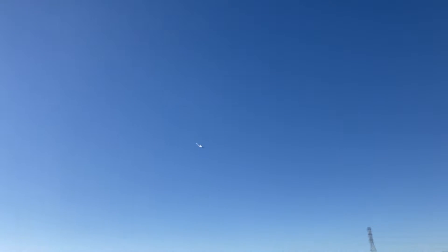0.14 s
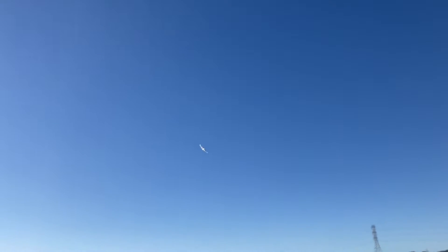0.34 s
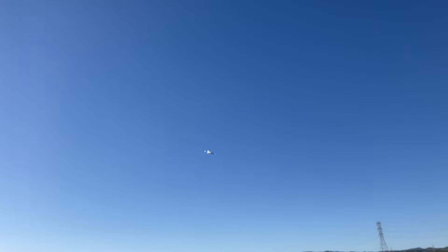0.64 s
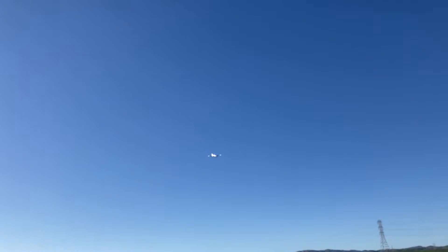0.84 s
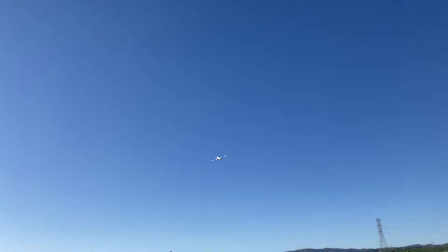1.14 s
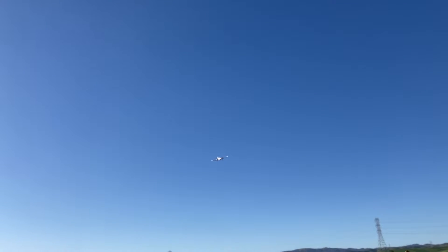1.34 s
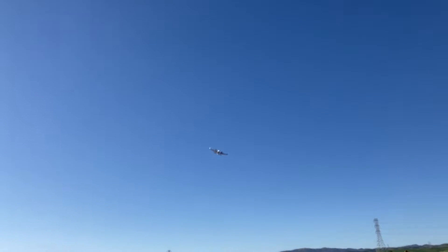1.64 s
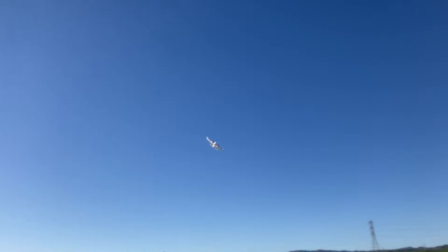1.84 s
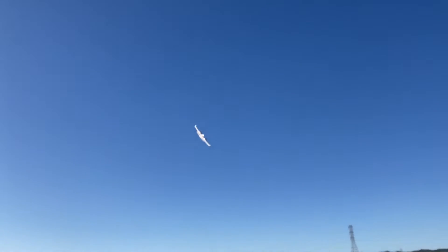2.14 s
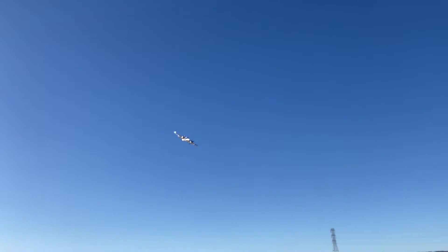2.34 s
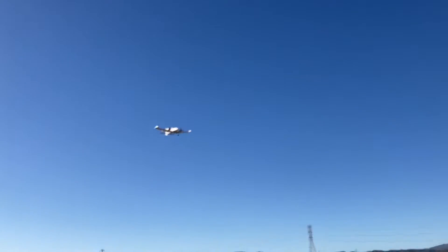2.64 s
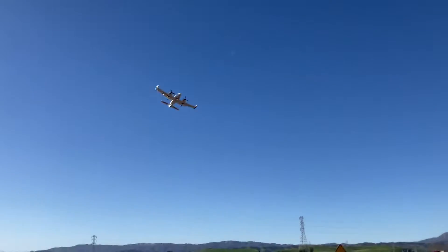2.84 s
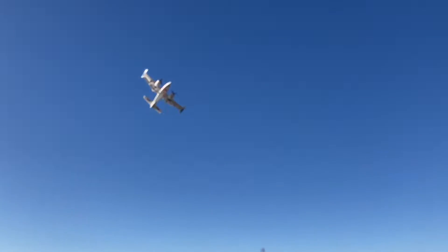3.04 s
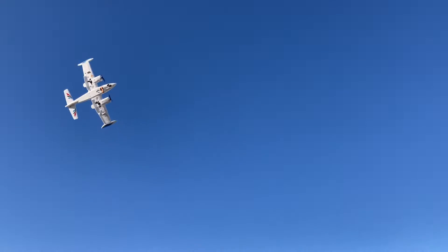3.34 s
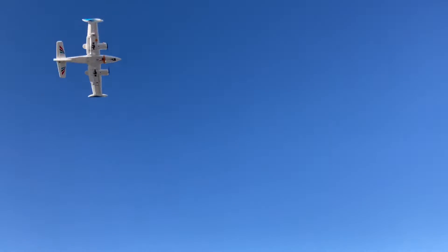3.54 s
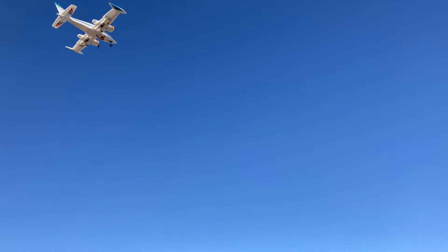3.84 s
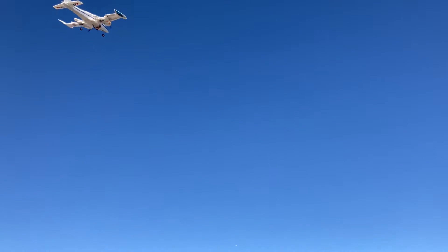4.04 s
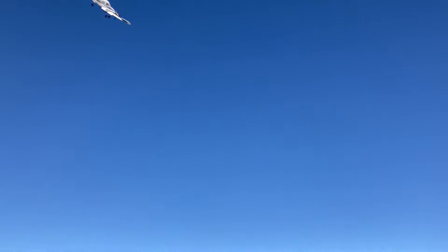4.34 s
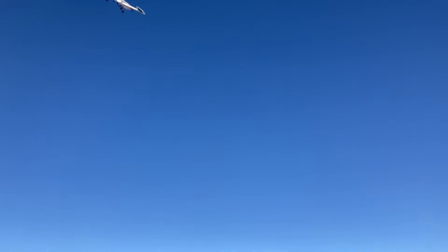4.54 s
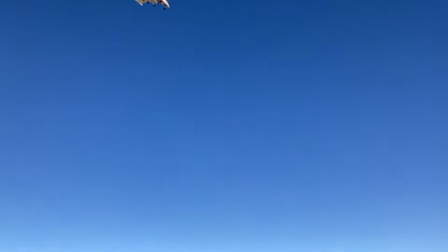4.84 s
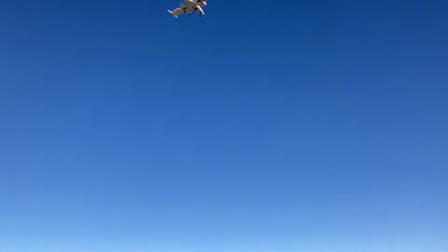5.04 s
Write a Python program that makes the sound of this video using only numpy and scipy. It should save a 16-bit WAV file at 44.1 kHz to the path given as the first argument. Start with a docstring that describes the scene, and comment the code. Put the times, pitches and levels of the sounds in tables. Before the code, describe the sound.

A phone outdoors catches breezy rumble and a muffled wash of open land. A thin piercing whistle grows as a small twin-motor plane approaches; gusts then batter the microphone as it passes low with rushing air and buzzing blades. Afterwards the wind eases, leaving shrill, uneven motor whines that glide down, dip away and return rising, with the plane still near.

```python
"""Twin-motor model airplane pass

A twin-motor electric model airplane comes in from afar, passes low overhead and banks away.
Two motors whine on separate gliding pitches; speed-controller whistles near 8 kHz sink as in Doppler shift.
Propellers buzz, torn air rushes and hisses: shaped noise with chopping and tones at the blade rate.
Noise gusts and short kicks buffet a phone's microphones, over a noise wash of open country."""
import sys
import numpy as np
from scipy import signal
from scipy.fft import rfft, irfft, next_fast_len
from scipy.io import wavfile
from scipy.ndimage import uniform_filter1d

SR = 44100
rng = np.random.default_rng(int(sys.argv[2]) if len(sys.argv) > 2 else 0)


def generate_wav(signal):
    """Clip the signal to [-1, 1] and save it as 16-bit WAV at the path in sys.argv[1]."""
    frames = np.transpose(np.atleast_2d(signal))
    scaled = np.clip(frames, -1, 1) * 32767
    pcm = np.round(scaled).astype(np.int16)
    wavfile.write(sys.argv[1], SR, pcm)


N = 228702
TIME_S, FREQ_HZ = np.arange(N) / SR, np.arange(N // 2 + 1) * SR / N

# stereo image, phase of right behind left: hz, half_turns
STEREO_PHASE = [(3000, 0), (4100, -.25), (6200, -.8), (7700, 0), (8300, 0), (9750, 1), (11400, 2),
                (13150, 3), (15750, 4.5)]
TOP_HZ = 15750

# distant wash, relative: time_s, level_db
COUNTRY_LEVEL = [(0, -35), (.55, -33), (1.9, -33), (3.3, -40), (3.9, -46), (4.4, -43), (4.85, -41),
                 (5.19, -36.5)]
# wash spectrum, relative: hz, density_db
COUNTRY_COLOUR = [(150, 4.5), (400, -0.5), (750, 2), (1100, -8.5), (1550, -21), (2300, -19), (2900, -31),
                  (3500, -46.5), (6000, -57.5)]
# the wash opens out to the sides
OPENS_FROM_S, OPENS_OVER_S = 3.13, 0.36

# gusts: full_strength_s, hold_s, rumble_db, relative_turbulence_db
GUSTS = [(0.0, 0.0035, -36, -24.5), (0.13, 0.06, -46, -43), (0.43, 0.086, -24, -33.5),
         (0.588, 0.075, -26, -43), (0.758, 0.091, -24.5, -41), (1.1, 0.14, -30, -30),
         (1.272, 0.13, -33.5, -33.5), (1.593, 0.041, -24.5, -35), (1.753, 0.21, -26.5, -29.5),
         (2.018, 0.15, -33.5, -34.5), (2.57, 0.03, -31, -28.5), (2.654, 0.095, -20, -17.5),
         (2.8, 0.054, -16, -14), (2.875, 0.055, -18, -19.5), (2.947, 0.04, -14, -15.5),
         (3.041, 0.084, -20.5, -23.5), (3.188, 0.042, -18, -21.5), (3.259, 0.092, -19, -22),
         (3.446, 0.093, -24, -28.5), (3.532, 0.17, -22.5, -25), (4.242, 0.13, -29, -60),
         (4.98, 0.23, -38.5, -57)]
GUST_ATTACK_S, GUST_RELEASE_S = .025, .028
# brief drops of the breeze: centre_s, width_s, change_db
CALMS = [(.28, 0.035, -4.5), (.96, 0.046, -7), (2.39, 0.075, -6.5), (4.62, 0.036, -8)]
# wind spectra, relative: hz, density_db
RUMBLE_COLOUR = [(15, -54), (30, -15.5), (50, 2), (75, 6), (110, 1.5), (160, -6), (250, -15), (500, -56.5)]
TURBULENCE_COLOUR = [(80, -3.5), (170, 5), (280, 1), (450, -4), (700, -15.5), (1100, -22.5), (1700, -37),
                     (3000, -71)]
# breeze between gusts; eddies relative, as in GUSTS
BREEZE_DB, BREEZE_EDDIES_DB, BREEZE_SWAY_DB = -30.5, -43, 1
# breeze rumble gives way to a deeper one, breeze eddies ease
LULL_S, LULL_DB, LULL_RUMBLE_DB, LULL_CORNER_HZ = 4.1, -1.5, -31, 95
# single eddies that slap the microphones: centre_s, relative_level_db, length_s, corner_hz
BUFFETS = [(0.029, -41, .004, 1160), (0.505, -30, 0.0057, 1280), (0.585, -35, .012, 1360),
           (0.63, -27.5, 0.0051, 960), (1.176, -28, 0.0051, 600), (1.19, -39, 0.038, 1380),
           (1.578, -32, 0.018, 1160), (1.781, -28.5, 0.011, 1420), (2.669, -19.5, 0.008, 730),
           (2.735, -12, 0.0093, 333), (2.818, -15.5, 0.0092, 530), (2.821, -26, 0.0057, 1350),
           (2.846, -11, 0.0024, 666), (2.945, -17, 0.0033, 250), (2.966, -15.5, 0.0068, 760),
           (3.047, -14, 0.0014, 687), (3.201, -10.5, 0.0011, 448), (3.283, -20, 0.0042, 550),
           (3.303, -36, 0.0076, 2070), (3.311, -13, 0.008, 170), (3.325, -15, 0.0045, 497),
           (3.389, -25, 0.007, 510), (3.446, -22, 0.011, 430), (3.588, -16.5, 0.017, 365),
           (3.669, -19, 0.019, 384), (3.736, -19.5, 0.032, 285), (3.767, -18, 0.0041, 250),
           (3.843, -17.5, 0.0039, 137), (3.845, -30.5, 0.0045, 760), (3.979, -22, 0.0054, 150),
           (4.412, -15, 0.0031, 127), (4.683, -28.5, 0.005, 150), (4.759, -36, 0.003, 400),
           (4.85, -28, 0.0078, 130), (4.99, -27, 0.0038, 415), (5.061, -36, 0.0053, 1120),
           (5.136, -31, 0.0035, 397)]

# straight pass
NEAREST_S, SPEED_M_S, NEAREST_M = 3.285, 10.8, 3.57
# first motor's whine, set by throttle, eased before the pass and again in the turn: time_s, pitch_hz
THROTTLE = [(0, 4245), (.95, 4665), (1.12, 4640), (1.4, 4530), (1.58, 4555), (1.75, 4460), (1.95, 4175),
            (2.15, 4070), (2.37, 4115), (2.47, 4365), (2.56, 4490), (2.7, 4515), (2.93, 4490), (3.1, 4385),
            (3.21, 4460), (3.29, 4570), (3.41, 4605), (3.57, 4535), (3.7, 4210), (3.98, 3830), (4.2, 3660),
            (4.35, 3370), (4.45, 3250), (4.55, 3250), (4.65, 3480), (4.72, 3740), (4.86, 3975),
            (5.02, 4005), (5.19, 4165)]
# second motor's whine above the first: time_s, offset_hz
SECOND_MOTOR = [(1.4, 20), (2.2, 28), (2.4, 60), (2.75, 130), (3, 135), (3.2, 115), (3.27, 190), (3.5, 115),
                (3.72, 10), (3.85, 60), (4, 70), (4.17, 160), (4.5, 90), (4.62, 110), (4.71, 230),
                (4.93, 190), (5.19, 175)]
# whine pitch per shaft rate; blades per propeller
WHINE_PER_TURN, BLADES = 36, 3

# controllers' switching whistle: time_s, pitch_hz
WHISTLE_PITCH = [(0, 8205), (.6, 8195), (.95, 8165), (1.6, 8185), (2.05, 8135), (2.4, 8150), (2.7, 8110),
                 (3.05, 8070), (3.25, 7990), (3.55, 7895), (3.85, 7805), (4.2, 7770), (4.7, 7785),
                 (5.19, 7810)]
# banking airframe shields or bares the controllers: time_s, change_db
WHISTLE_SHADE = [(0, -14), (.45, -2), (1.3, -1), (3.1, 0), (3.3, 2), (3.65, 0), (3.87, 4), (4.12, -1),
                 (4.3, 0), (4.4, -9), (4.55, -9), (4.62, 1), (5.19, 1)]
# whistle side lines: shaft_rate_multiple, relative_db
SIDE_LINES = [(-1, -10), (1, -14), (3, -17)]
# level at nearest point before shading; loss in the air
WHISTLE_DB, AIR_DB_PER_M = -43, 0.01
# the second controller switches lower by DETUNE_HZ
DETUNE_HZ, WHISTLE_WAVER_HZ = 21, 4.5
# whistle and hiss swell briefly on the approach
SWELL_AT_S, SWELL_WIDTH_S, SWELL_DB = 0.98, 0.034, 8.5

# propeller buzz: time_s, level_db
BUZZ_LEVEL = [(2.6, -57.5), (3.1, -52.5), (3.4, -47), (3.9, -46), (4.2, -49), (4.45, -56.5), (4.85, -54),
              (5.19, -47)]
# buzz spectrum, relative: hz, density_db
BUZZ_COLOUR = [(950, 4), (1100, 7.5), (1500, -16.5), (1900, 3.5), (2300, 5.5), (2700, 4.5), (3100, -6.5),
               (3500, -14)]
CHOP_DEPTH = .8  # 0-1
# blade-rate multiples; level of each against the chopped noise
BLADE_ORDERS, BLADE_TONE_DB = range(3, 10), -7.5
REFLECTION_S, REFLECTION_DB = .00261, -4

# fine top hiss, relative: time_s, level_db
HISS_LEVEL = [(0, -74.5), (.36, -65.5), (1.05, -63), (3.1, -47), (4.1, -49.5), (4.45, -53.5), (4.75, -48.5),
              (5.19, -49)]
# air torn by propellers and wings: time_s, level_db
RUSH_LEVEL = [(0, -87), (1.08, -77.5), (1.19, -59), (1.245, -65), (1.295, -58.5), (1.38, -74),
              (2.48, -70.5), (2.65, -49), (3.4, -48), (4.15, -46), (4.45, -51), (4.8, -48.5), (5.0, -50),
              (5.19, -61)]
# blade-tip hiss, thrown forward, gone once past overhead: time_s, level_db
TIP_LEVEL = [(2.45, -85), (2.66, -52.5), (3.32, -54), (3.45, -81), (5.19, -80)]
# air spectra, relative: hz, density_db
HISS_COLOUR = [(7750, -36), (7950, -6), (8150, 7), (9500, -0.5), (11200, 5.5), (13000, -3), (15700, -1)]
RUSH_COLOUR = [(400, 6), (750, -8), (1050, 3.5), (1300, 0), (1620, -1), (1950, 1.5), (2600, 1.5),
               (3400, -1), (4400, 2), (5200, -4.5), (6400, -15), (7700, -6.5)]
TIP_COLOUR = [(5100, 3.5), (5600, 2.5), (6400, -6.5), (7200, 0.5), (7800, 11.5)]

# first motor's whine as the plane rolls and turns it to the listener: time_s, level_db
FIRST_WHINE = [(0, -74), (.2, -100), (.95, -90), (1.08, -81), (1.15, -65), (1.25, -80), (1.36, -78),
               (1.55, -77), (1.7, -83), (1.85, -73), (2.02, -66), (2.38, -65), (2.5, -68), (2.63, -54),
               (2.85, -51), (3.04, -56), (3.1, -41.5), (3.38, -48), (3.49, -43), (3.61, -51), (3.72, -45),
               (3.85, -52), (4.02, -44), (4.1, -36), (4.22, -35), (4.32, -47), (4.42, -56), (4.46, -72),
               (4.54, -70), (4.562, -47), (4.63, -46), (4.67, -38.5), (4.74, -43), (4.81, -37), (4.94, -42),
               (5.02, -56), (5.19, -56)]
# second motor's whine, at times hidden by the fuselage: time_s, level_db
SECOND_WHINE = [(1.1, -100), (1.4, -82), (1.7, -82), (2.05, -72), (2.4, -71), (2.68, -68), (2.75, -52),
                (2.86, -62), (3.0, -44), (3.1, -55), (3.3, -48), (3.6, -58), (3.78, -54), (3.84, -38),
                (3.93, -43), (3.98, -53), (4.05, -45), (4.2, -45), (4.4, -62), (4.55, -63), (4.65, -57),
                (4.7, -41.5), (4.79, -50), (4.95, -44), (5.02, -55), (5.19, -52)]
# motor and blade tones beamed past the listener: share_of_whine_pitch, level_db, loudest_s, width_s
PROP_TONES = [(.1667, -49, 4.62, .07), (.1667, -46.5, 4.93, .09), (.28, -49, 3.93, .08),
              (.29, -53, 4.27, .06), (.333, -51.5, 3.46, .16), (.333, -51, 3.82, .09),
              (.486, -48.5, 3.45, .11), (.486, -50.5, 4.14, .15), (.535, -58, 4.47, .14),
              (.535, -53, 4.84, .14), (.57, -55, 4.05, .12), (.75, -54, 3.8, .12)]
FADING_DB = 2
# ground echo against the direct whine; path wander in wavelengths, wander rate per s
GROUND_DB, GROUND_OVERHEAD_DB, GROUND_WANDER, GROUND_RATE = -11, -4, .8, 4.5


def undb(db):
    """Decibels to gain."""
    return 10 ** (np.asarray(db) / 20)


def curve(table):
    """Value of a (time_s, value) table at every sample."""
    times_s, values = np.transpose(table)
    return np.interp(TIME_S, times_s, values)


def bump(centre_s, width_s):
    """Smooth rise to 1 and fall around one moment."""
    return np.exp(-((TIME_S - centre_s) / width_s) ** 2)


def walk(rate_hz):
    """Smooth random curve of spread 1, changing about rate_hz times a second."""
    size = next_fast_len(N)
    hz = np.arange(size // 2 + 1) * SR / size
    spectrum = rfft(rng.standard_normal(size)) * np.exp(-(hz / rate_hz) ** 2)
    x = irfft(spectrum, size)[:N]
    return x / x.std()


def noise(colour):
    """Noise of rms 1 with a (hz, density_db) spectrum, falling 150 dB per octave beyond its ends."""
    hz, db = np.transpose(colour)
    octave, knots = np.log2(FREQ_HZ + 1), np.log2(hz)
    beyond = np.abs(octave - np.clip(octave, knots[0], knots[-1]))
    gain = undb(np.interp(octave, knots, db) - 150 * beyond)
    x = irfft(rfft(rng.standard_normal(N)) * gain, N)
    return x / x.std()


def steady(x, span_s):
    """Even out swells slower than span_s, so that a curve sets the level."""
    power = uniform_filter1d(x ** 2, max(int(span_s * SR), 8))
    return x / np.sqrt(power + 1e-9)


def stereo(x):
    """Stereo spread: alike in the bass, in and out of phase up the treble."""
    turn = np.exp(-1j * np.pi * np.interp(FREQ_HZ, *np.transpose(STEREO_PHASE)))
    return np.array([x, irfft(rfft(x) * turn, N)])


def wide(colour, width, split_hz):
    """Noise from all around: alike on both sides in the bass, differing higher up."""
    side = irfft(rfft(noise(colour)) / (1 + (split_hz / (FREQ_HZ + 1)) ** 6), N)
    return noise(colour) + width * side * np.array([[1], [-1]])


def tone(hz, waver_hz, flutter_db):
    """Line whose pitch and level waver in the moving air."""
    phase = 2 * np.pi * np.cumsum(hz + waver_hz * walk(45.1)) / SR
    return np.sqrt(2) * np.sin(phase) * undb(flutter_db * walk(33))


def country():
    """Breeze over distant grass and trees, a noise wash that opens out to the sides around the pass."""
    share = np.clip((TIME_S - OPENS_FROM_S) / OPENS_OVER_S, 0, 1)
    narrow = wide(COUNTRY_COLOUR, width=1.0, split_hz=1100)
    broad = wide(COUNTRY_COLOUR, width=1.0, split_hz=480)
    level_db = curve(COUNTRY_LEVEL) - 2.0 + 1.38 * walk(39)
    return (np.sqrt(1 - share) * narrow + np.sqrt(share) * broad) * undb(level_db)


def gust(full_s, hold_s):
    """A gust rises quickly, holds from full_s and dies away exponentially."""
    rise = np.clip(1 + (TIME_S - full_s) / GUST_ATTACK_S, 0, 1)
    return rise * np.exp(-np.maximum(TIME_S - full_s - hold_s, 0) / GUST_RELEASE_S)


def wind():
    """Pressure rumble and brighter, intermittent turbulence: gusts add power to a swaying breeze."""
    sway_db = BREEZE_SWAY_DB * walk(9.2)
    sway_db = sway_db + sum(db * bump(centre_s, width_s) for centre_s, width_s, db in CALMS)
    lull = np.clip((TIME_S - LULL_S) / 0.04, 0, 1)
    rumble_power = undb(BREEZE_DB + sway_db) ** 2 * (1 - lull)
    eddy_power = undb(BREEZE_EDDIES_DB + sway_db + LULL_DB * lull) ** 2
    for full_s, hold_s, rumble_db, turbulence_db in GUSTS:
        shape = gust(full_s, hold_s)
        rumble_power = rumble_power + (shape * undb(rumble_db)) ** 2
        eddy_power = eddy_power + (shape * undb(turbulence_db)) ** 2
    rumble = steady(noise(RUMBLE_COLOUR), span_s=0.086) * np.sqrt(rumble_power)
    eddies = wide(TURBULENCE_COLOUR, width=1.0, split_hz=1110) * undb(2.44 * walk(74))
    turbulence = steady(eddies, span_s=0.059) * np.sqrt(eddy_power)
    low_pass = signal.butter(2, LULL_CORNER_HZ, fs=SR, output="sos")
    deep = steady(signal.sosfilt(low_pass, noise(RUMBLE_COLOUR)), span_s=0.2)
    return rumble + undb(-2.5) * turbulence + deep * lull * undb(LULL_RUMBLE_DB + sway_db)


def buffets():
    """Each eddy is a pressure kick inside a short noise swirl, band-passed below its corner."""
    out = np.zeros(N)
    for centre_s, db, length_s, corner_hz in BUFFETS:
        envelope = np.exp(-.5 * ((TIME_S - centre_s) / length_s) ** 2)
        swirl = 0.82 * rng.standard_normal(N) * envelope
        swirl[int(centre_s * SR)] += 0.7 * np.sqrt(length_s * SR) * rng.choice([-1, 1])
        band = signal.butter(4, [corner_hz / 5, corner_hz], "band", fs=SR, output="sos")
        # make up for the power lost to a narrow band
        out += signal.sosfilt(band, swirl) * undb(db) * np.sqrt(SR / 2 / corner_hz)
    return out


def distance():
    """Metres to the plane on its straight run overhead."""
    return np.hypot(SPEED_M_S * (TIME_S - NEAREST_S), NEAREST_M)


def controllers(carrier_hz):
    """Two nearly equal switching whistles beat and fade with distance; turning shafts add side lines."""
    metres = distance()
    shaft_hz = curve(THROTTLE) / WHINE_PER_TURN
    level_db = WHISTLE_DB + curve(WHISTLE_SHADE) - AIR_DB_PER_M * (metres - NEAREST_M)
    level_db = level_db + SWELL_DB * bump(SWELL_AT_S, SWELL_WIDTH_S)
    gain = undb(level_db) * NEAREST_M / metres
    first = tone(carrier_hz, WHISTLE_WAVER_HZ, flutter_db=2)
    second = undb(-6) * tone(carrier_hz - DETUNE_HZ, WHISTLE_WAVER_HZ, flutter_db=2)
    side_lines = sum(undb(db) * tone(carrier_hz + k * shaft_hz, waver_hz=10, flutter_db=3)
                     for k, db in SIDE_LINES)
    return stereo(gain * (first + second + side_lines))


def propellers():
    """Blades chop turbulent air into a rough buzz with gliding harmonics, combed by a close reflection."""
    first_hz = curve(THROTTLE)
    buzz = 0
    for whine_hz in (first_hz, first_hz + curve(SECOND_MOTOR)):
        blade_hz = whine_hz * BLADES / WHINE_PER_TURN
        chop = 1 + CHOP_DEPTH * np.sin(2 * np.pi * np.cumsum(blade_hz) / SR)
        chopped = noise(BUZZ_COLOUR) * chop
        harmonics = sum(tone(k * blade_hz, waver_hz=12, flutter_db=3) for k in BLADE_ORDERS)
        buzz = buzz + chopped + undb(BLADE_TONE_DB) * harmonics
    buzz = buzz + undb(REFLECTION_DB) * np.interp(TIME_S - REFLECTION_S, TIME_S, buzz)
    return stereo(buzz / buzz.std() * undb(curve(BUZZ_LEVEL) + 1.5 * walk(25)))


def air(rush_db):
    """Propeller and wing noise: coloured rush, blade-tip hiss on the approach, fine hiss on top."""
    hiss_db = curve(HISS_LEVEL) + SWELL_DB * bump(SWELL_AT_S, SWELL_WIDTH_S)
    hiss_db = hiss_db + 2.0 + 0.77 * walk(26)
    hiss = stereo(noise(HISS_COLOUR)) + undb(-22) * wide(HISS_COLOUR, width=4.5, split_hz=700)
    rush = stereo(noise(RUSH_COLOUR)) + undb(-10) * wide(RUSH_COLOUR, width=3.5, split_hz=810)
    tips = noise(TIP_COLOUR) * undb(curve(TIP_LEVEL))
    flutter = undb(walk(24))
    return flutter * (rush * undb(rush_db) + tips) + hiss * undb(hiss_db)


def whine(hz):
    """Motor whine and its ground echo, which swell and cancel unevenly, most of all overhead."""
    phase = 2 * np.pi * np.cumsum(hz + 5 * walk(47)) / SR
    echo_gain = undb(GROUND_DB + (GROUND_OVERHEAD_DB - GROUND_DB) * bump(NEAREST_S, .45))
    echo = echo_gain * np.sin(phase + 2 * np.pi * GROUND_WANDER * walk(GROUND_RATE))
    unit_power = np.sqrt(2 / (1 + echo_gain ** 2))
    return (np.sin(phase) + echo) * unit_power * undb(FADING_DB * walk(31))


def motors(carrier_hz, rush_db):
    """Each motor whines and beats against controller switching; lower tones sing from the pass onward."""
    first_hz = curve(THROTTLE)
    second_hz = first_hz + curve(SECOND_MOTOR)
    out = 0
    for share, db, loudest_s, width_s in PROP_TONES:
        line = tone(share * first_hz, waver_hz=8, flutter_db=2.5)
        out = out + undb(db) * bump(loudest_s, width_s) * line
    for hz, levels, beat_db in ((first_hz, FIRST_WHINE, -22), (second_hz, SECOND_WHINE, -25)):
        # difference tone grows at part throttle, where the current is chopped hardest
        throttle_db = 20 * np.log10(hz / hz.max())
        beat_gain = undb(beat_db - 4 * throttle_db)
        beat = beat_gain * tone(carrier_hz - hz, waver_hz=22, flutter_db=3)
        out = out + undb(curve(levels)) * whine(hz) + undb(rush_db) * beat
    return stereo(out)


def scene():
    """The plane over the field, with wind on the microphones."""
    gusts = wind() + undb(1.0) * buffets()
    # the hardest gusts are rounded off in the microphone ports
    gusts = .85 * np.tanh(gusts / .85)
    carrier_hz, rush_db = curve(WHISTLE_PITCH), curve(RUSH_LEVEL)
    plane = controllers(carrier_hz) + propellers() + air(rush_db) + motors(carrier_hz, rush_db)
    return country() + gusts + plane


def record(dry):
    """A few milliseconds of fade at each end, and the phone's steep top cut."""
    ease = np.clip(np.minimum(TIME_S, TIME_S[-1] - TIME_S) / .006, 0, 1)
    top_cut = signal.ellip(10, .2, 80, TOP_HZ, fs=SR, output="sos")
    return signal.sosfilt(top_cut, dry * ease ** 2)


dry = scene()
out = record(dry)
generate_wav(out)
```